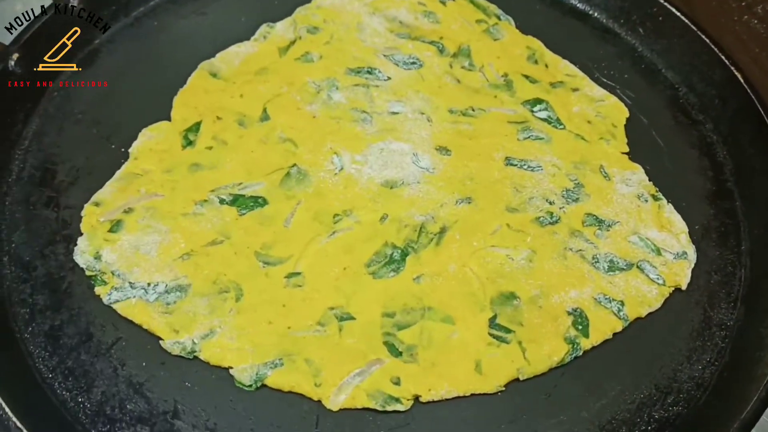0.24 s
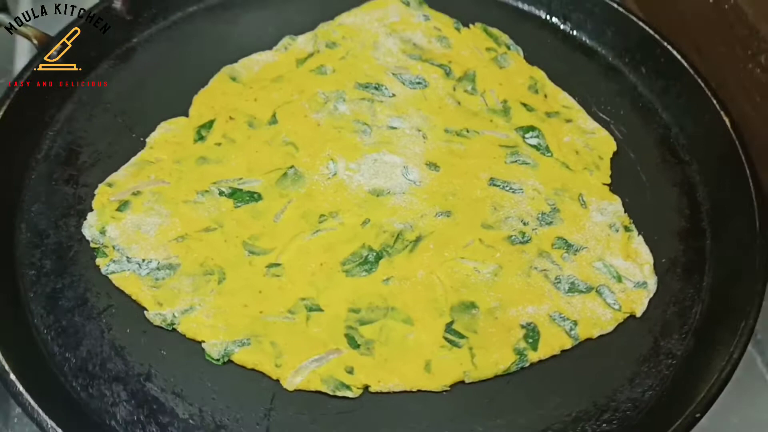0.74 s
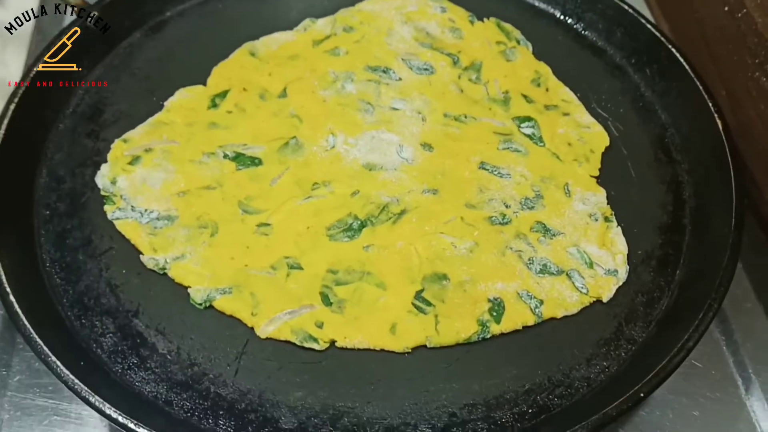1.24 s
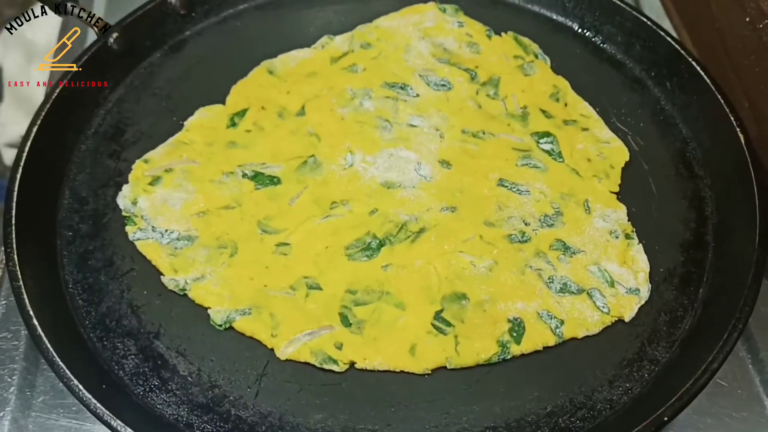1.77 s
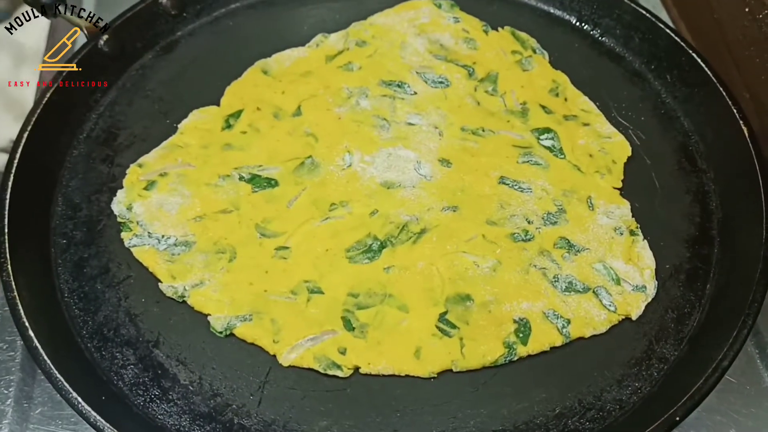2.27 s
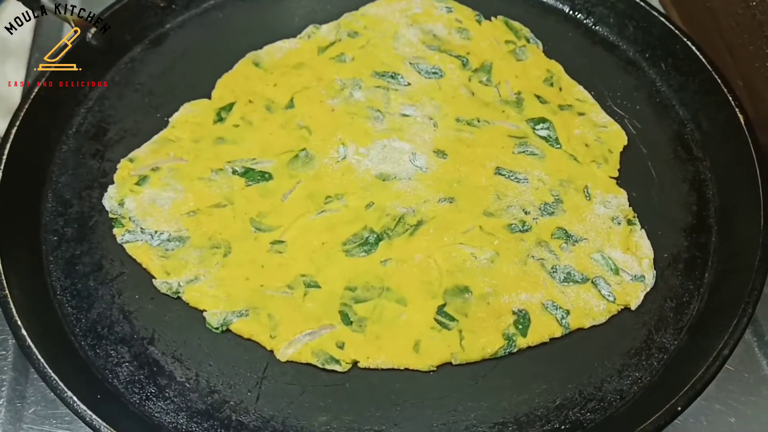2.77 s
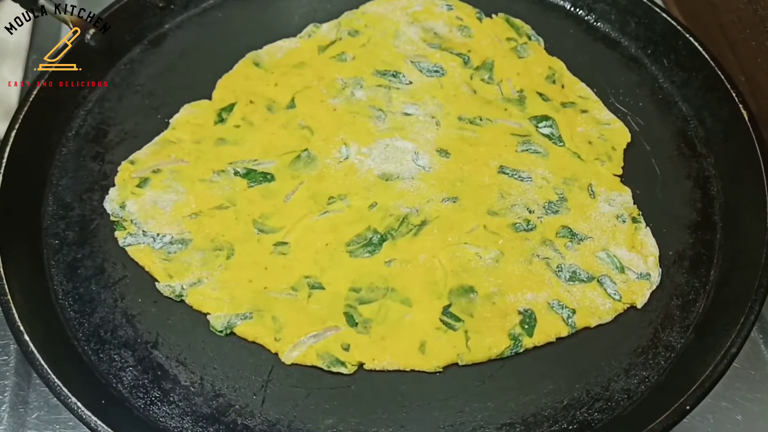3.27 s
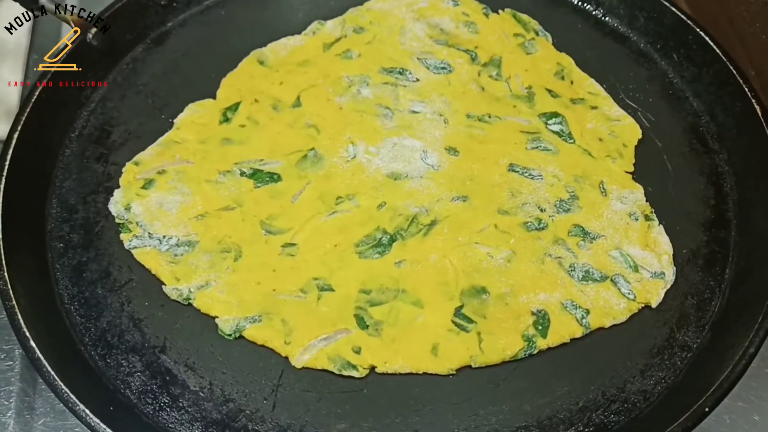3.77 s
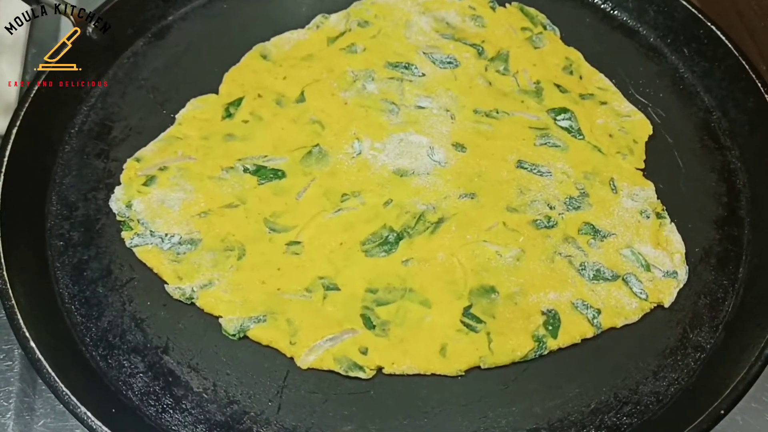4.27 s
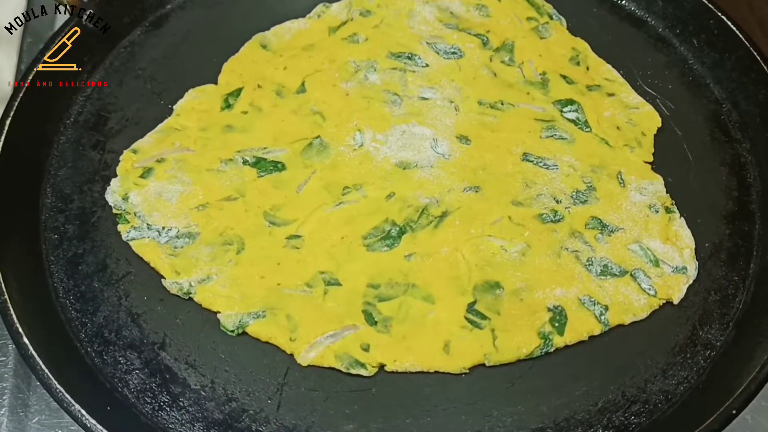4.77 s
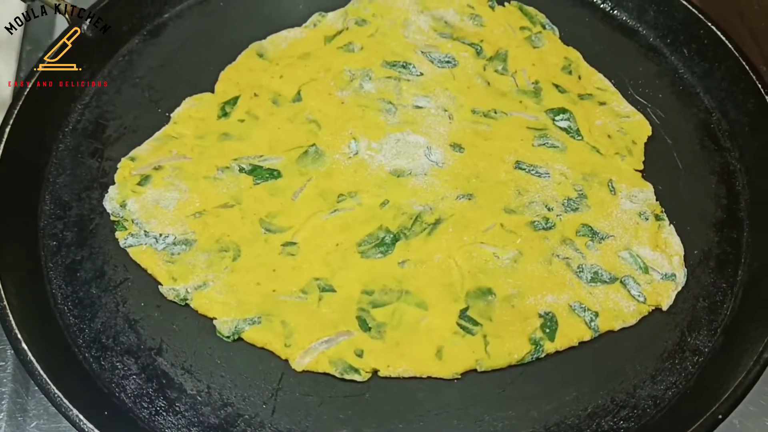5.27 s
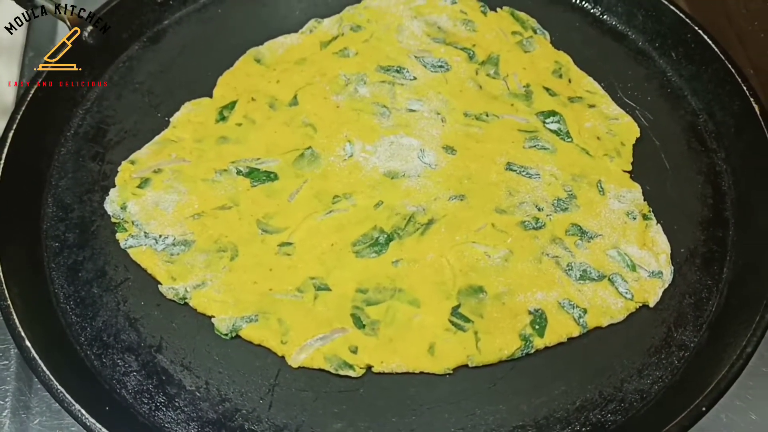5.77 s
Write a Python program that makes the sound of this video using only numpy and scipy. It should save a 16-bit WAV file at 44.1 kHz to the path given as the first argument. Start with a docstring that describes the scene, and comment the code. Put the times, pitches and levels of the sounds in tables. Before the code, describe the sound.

Faint burner hiss and low bubbling in a small kitchen, broken by wooden knocks, thin bangle clinks and brief steel clatter.

```python
"""A gas flame hisses and something bubbles with dull low thumps in a near-steady beat, about six a
second, with others falling between. A flatbread cooks on an iron griddle in a small, hard-walled kitchen.
The griddle spits, wrist bangles clink, and the cook slides things about, handles steel dishes, bumps a
heavy pan and knocks wood on the counter. Flame, spits and slides are shaped noise. Thumps, metal and
wood ring with fading tones after each short push, and echo off the walls."""
import sys
import numpy as np
from scipy import signal
from scipy.fft import rfft, irfft
from scipy.io import wavfile
from scipy.ndimage import uniform_filter1d

SR = 44100
rng = np.random.default_rng(int(sys.argv[2]) if len(sys.argv) > 2 else 0)


def int16_out(signal):
    """Quantize to a 16-bit WAV file."""
    q = np.round(np.clip(np.atleast_2d(signal).T, -1, 1) * 32767)
    wavfile.write(sys.argv[1], SR, q.astype(np.int16))


N = 265923


def from_db(db):
    """Turn decibels into a number to multiply a sound by."""
    return 10 ** (np.asarray(db) / 20)


def at_hz(points, hz):
    """Read between the rows of a table, spacing the octaves evenly."""
    points = np.array(points)
    return np.interp(np.log(hz), np.log(points[:, 0]), points[:, 1])


def coloured(spectrum, size=N):
    """Noise of strength 1, its lows and highs shaped by rows of Hz and dB."""
    hz = np.maximum(np.fft.rfftfreq(size, 1 / SR), 1)
    noise = irfft(rfft(rng.standard_normal(size)) * from_db(at_hz(spectrum, hz)), size)
    return noise / noise.std()


def humped(spectrum, peaks):
    """Shaped noise with a few narrow bands made louder or softer."""
    noise = coloured(spectrum)
    for hz, width_hz, db in peaks:
        band = signal.lfilter(*signal.iirpeak(hz, hz / width_hz, fs=SR), noise)
        noise = noise + (from_db(db) - 1) * band
    return noise


def ring(clicks, hz, ring_s):
    """Each click starts a pure tone. Its ring time, ring_s, is how long it takes to fade by 60 dB."""
    decay, angle = from_db(-60 / (ring_s * SR)), 2 * np.pi * hz / SR
    return signal.lfilter([0, np.sin(angle)], [1, -2 * decay * np.cos(angle), decay ** 2], clicks + 1e-18)


def split_ring(touches, hz, ring_s):
    """Round things ring in close groups: a tone wavers against two weaker neighbours."""
    neighbours = hz * (1 + .008 * rng.standard_normal(2))
    return .8 * ring(touches, hz, ring_s) + .3 * sum(ring(touches, n, ring_s) for n in neighbours)


def blow(contact, tones, levels_db, spread_db):
    """One contact rings all the tones of an object, each with a partly random strength."""
    strengths = from_db(spread_db * rng.standard_normal(len(tones)))
    strengths *= (-1) ** np.arange(len(tones))   # neighbours swing opposite ways
    return sum(strength * from_db(db + level) * ring(contact, hz, ring_s)
               for (hz, db, ring_s), level, strength in zip(tones, levels_db, strengths))


def add(track, start, sound):
    """Mix a sound into a track at a start time in seconds."""
    i = max(round(start * SR), 0)
    track[i:i + len(sound)] += sound[:N - i]


def flame():
    """Gas hisses out of the burner over a low murmur that flickers."""
    # Each row: frequency in Hz, level in dB.
    hiss_spectrum = [(1180, -33.5), (2000, -12), (2980, -11), (3230, -7.5), (3650, -14.5), (4260, -4.5),
                     (5160, -8), (6140, -11), (8330, 0), (9090, -7.5), (10600, -5.5), (12900, -15.5),
                     (13400, -4.5), (14900, 0.5), (16000, -12.5)]
    murmur_spectrum = [(15, -65), (25, -29.5), (37, -41), (78, 2), (162, -0.5), (300, -12), (378, -16.5),
                       (477, -20), (954, -21.5), (1200, -23.5), (2500, -44.5), (3250, -74.5), (5500, -120)]
    # Each row: centre in Hz, width in Hz, boost or cut in dB.
    hiss_peaks = [(3435, 46, 8.5), (4450, 100, 0.5), (5050, 160, 6.5), (7810, 190, 6), (10340, 260, 2.5),
                  (12500, 880, 1.5), (13140, 250, 0), (13770, 400, -1.5), (14200, 430, -10)]
    murmur_peaks = [(149.5, 11, 7.5), (127, 14, -6.5)]   # a narrow low hum near 150 Hz, with a dip just below it
    # Each row: time in seconds, level in dB.
    hiss_levels = [(0.0, -57), (0.47, -57.5), (1.09, -54.5), (1.21, -55), (1.76, -57), (2.22, -53.5),
                   (2.6, -55), (2.72, -57.5), (3.39, -59), (3.68, -55.5), (3.79, -53.5), (3.91, -55),
                   (4.7, -54.5), (4.87, -54), (5.21, -53.5), (5.64, -57), (5.76, -55), (5.88, -52.5),
                   (6.03, -54.5)]
    murmur_levels = [(0.0, -58), (0.34, -55.5), (0.91, -53), (1.02, -48), (1.16, -49.5), (1.93, -50.5),
                     (2.23, -47), (2.54, -46.5), (2.74, -54.5), (2.94, -56), (3.06, -53.5), (3.51, -57.5),
                     (3.64, -56), (3.76, -52), (3.96, -53), (4.77, -53.5), (4.99, -54), (5.31, -59),
                     (5.48, -52.5), (5.62, -58.5), (5.84, -57), (6.03, -55)]
    t = np.arange(N) / SR
    hiss_db = np.interp(t, *np.transpose(hiss_levels))
    murmur_db = np.interp(t, *np.transpose(murmur_levels))
    flicker_db = 2.5 * np.interp(9 * t, np.arange(200), rng.standard_normal(200))   # 9 values a second
    murmur = from_db(murmur_db + flicker_db) * humped(murmur_spectrum, murmur_peaks)
    return from_db(hiss_db) * humped(hiss_spectrum, hiss_peaks) + murmur


def rustle_and_slides():
    """A faint rustle never stops, and swells when something rubs across the counter."""
    # Each row: start in seconds, length in seconds, level in dB.
    slides = [(0.58, 0.076, -65), (1.104, .1, -62.5), (1.887, 0.04, -66), (2.122, 0.08, -63),
              (2.346, 0.065, -55), (2.596, 0.11, -60), (3.4, 0.19, -65.5), (3.72, 0.28, -62),
              (3.991, 0.19, -52.5), (4.4, 0.086, -59), (4.725, 0.09, -49), (4.84, 0.22, -55.5),
              (5.108, 0.091, -52.5), (5.236, 0.4, -64), (5.813, 0.28, -63.5)]
    # Each row: frequency in Hz, level in dB.
    rub_spectrum = [(260, -4.5), (450, 2), (503, 0), (752, -3.5), (851, -12), (920, -1), (1040, -16),
                    (1760, -8.5), (2010, -19.5), (4070, -12), (6500, -16.5), (8450, -51.5), (14300, -120)]
    rise_s, fade_s = 0.018, 0.0442
    t, level = np.arange(N) / SR, from_db(-63)
    for start, length, db in slides:
        rise = np.clip((t - start) / rise_s, 0, 1)
        fade = np.exp(-np.maximum(t - start - length, 0) / fade_s)
        level = level + from_db(db) * rise * fade
    return level * coloured(rub_spectrum)


def bubble_thumps():
    """Each thump is a soft pulse with a noisy edge and a fainter repeat; low tones ring after it."""
    # Each row: start in seconds, level in dB.
    thumps = [(.004, -35.5), (0.18, -39), (0.318, -40), (.392, -37), (.496, -39.5), (0.592, -35),
              (0.673, -36), (.774, -36.5), (.841, -36.5), (.954, -39), (1.012, -35), (1.156, -33),
              (1.332, -37.5), (1.348, -33.5), (1.506, -36.5), (1.691, -33), (1.854, -35), (2.211, -38),
              (2.517, -35), (2.702, -32.5), (2.88, -38), (2.898, -37), (3.036, -38), (3.107, -39),
              (3.21, -39), (3.322, -41), (3.368, -39.5), (3.485, -48.5), (3.543, -38.5), (3.557, -35.5),
              (3.716, -37.5), (3.75, -40.5), (3.891, -37), (3.934, -31), (4.115, -33), (4.232, -38.5),
              (4.517, -35), (4.584, -37.5), (4.906, -30), (5.088, -35), (5.221, -35.5), (5.265, -33),
              (5.374, -35.5), (5.436, -32.5), (5.594, -37), (5.624, -35.5), (5.805, -40.5), (5.834, -36.5),
              (5.977, -35), (6.023, -34.5)]
    # Each row: frequency in Hz, level in dB.
    edge_spectrum = [(250, -28.5), (420, 9), (620, -7), (960, -10), (1200, -18), (2500, -28.5)]
    # Each row: pitch in Hz, level in dB, ring time in seconds.
    body_tones = [(169.6, -42, 0.087), (393.7, -41.5, 0.056), (239.4, -40.5, 0.032)]
    pulse_hz, repeat_s = 222.2, 0.0334
    out, t = np.zeros(N), np.arange(SR // 40) / SR
    cycles = t * pulse_hz - .6
    pulse = np.cos(2 * np.pi * cycles) * np.exp(-(cycles / 0.44) ** 2)
    edge_shape = np.exp(-((t - .006) / 0.0055) ** 2)
    for start, db in thumps:
        edge_db = -15 + 4 * rng.standard_normal()
        edge = from_db(edge_db) * coloured(edge_spectrum, len(t)) * edge_shape
        add(out, start, from_db(db) * (pulse - pulse.mean() + edge))
    add(out, repeat_s, from_db(-8) * out)
    return out + sum(from_db(db) * ring(out, hz, ring_s) for hz, db, ring_s in body_tones)


def griddle_spits():
    """The hot griddle spits in tiny dry bursts of noise."""
    # Each row: start in seconds, level in dB.
    spits = [(0.4096, -46), (0.7761, -49), (1.276, -41), (2.8799, -52), (3.24, -48), (5.9804, -42)]
    # Each row: frequency in Hz, level in dB.
    spectrum = [(1000, -3), (2000, -6), (4500, -2), (7000, -8), (12000, -19)]
    out, t = np.zeros(N), np.arange(SR // 20) / SR
    for start, db in spits:
        add(out, start, from_db(db) * coloured(spectrum, len(t)) * np.exp(-t / 0.0007))
    return out


def background_dips():
    """A volume curve that dips briefly and smoothly."""
    # Each row: middle in seconds, half width in seconds, change in dB.
    dips = [(.46, 0.045, 0), (.87, 0.024, -1), (1.3, 0.044, -2.5), (1.83, 0.021, -2.5), (2.85, 0.032, -2.5),
            (3.3, 0.043, -2.5), (3.67, .04, -2.5), (4.29, 0.026, -3), (4.63, 0.056, -0.5),
            (5.08, .02, -2.5), (5.59, 0.042, -3.5), (5.77, 0.021, -4.5)]
    t = np.arange(N) / SR
    return from_db(sum(db * np.exp(-((t - middle) / width) ** 2) for middle, width, db in dips))


def bangles():
    """Two hard rings of different sizes rattle together: a bright spray of noise, and both ring."""
    # Each row: time in seconds, level in dB, clear ringing in dB, treble tilt in dB per octave,
    # pitch of the louder bangle in Hz, pitch of the other in Hz.
    clinks = [(.571, -38.5, -6, 3, 8370, 7600), (.587, -40, 1, -4, 8430, 8900),
              (.63, -38, -6, -4, 9340, 8600), (.9892, -33.5, -0.5, -2, 9020, 7630),
              (1.0425, -17, -15, 1, 9250, 7600), (1.693, -27, -9, 6, 9170, 8030),
              (1.9275, -41, -4, -6.5, 7430, 9100), (2.0163, -41, 4.5, -7, 9060, 8300),
              (2.6319, -34.5, -13.5, 0, 7440, 9500), (3.563, -31.5, -9, 1.5, 7600, 9150),
              (3.7504, -41.5, -12, -2, 7440, 9100), (3.8382, -44, -5, -1, 9000, 8450),
              (4.506, -34.5, -13, -1, 8800, 7760), (4.6644, -34, -3, -6.5, 9320, 7570),
              (4.7167, -36, -6, 1.5, 9200, 7630), (4.7576, -34, -14, -4, 7530, 9100),
              (4.786, -29.5, -10, -2, 9150, 7570), (5.4983, -44.5, -5, 7, 8450, 7570),
              (5.655, -25.5, -3, 0, 8440, 7620)]
    # Each row: multiple of the bangle's pitch, level in dB.
    tones = [(.432, -25), (.696, -20.5), (1.001, -10), (1.327, -13), (1.678, -5.5), (2.04, -2)]
    # Each row: frequency in Hz, level in dB.
    spray_spectrum = [(1500, -89.5), (3500, -55.5), (5000, -36.5), (6400, -26), (8900, -17.5), (12000, -23),
                      (15200, -10.5)]
    rise_s, rattle_s = .0007, 0.01325
    out, t = np.zeros(N), np.arange(SR // 3) / SR
    shape = (1 - np.exp(-t / rise_s)) * np.exp(-t / rattle_s)
    for start, db, ring_db, tilt_db, loud_hz, other_hz in clinks:
        tilted = [(hz, level + tilt_db * np.log2(hz / loud_hz)) for hz, level in spray_spectrum]
        sound = from_db(-6) * coloured(tilted, len(t)) * shape
        touches = rng.standard_normal(len(t)) * shape
        touches /= np.sqrt(np.sum(touches ** 2))
        strike = .6 * touches + .8 * (t == 0)   # adds a firm first touch
        for hz, bangle_db in [(loud_hz, 0), (other_hz, -8.5)]:
            for ratio, level in tones:
                clear = from_db(ring_db) * split_ring(strike, hz * ratio, ring_s=.1)
                # While the rings press together, each tone dies fast and blurs.
                blurred = from_db(-2) * ring(touches, hz * ratio, ring_s=0.018)
                sound += from_db(level + bangle_db + tilt_db * np.log2(ratio)) * (clear + blurred)
        add(out, start - .002, from_db(db) * sound)
    # Cut the lows below 5000 Hz so the clinks stay thin and bright.
    return signal.sosfilt(signal.butter(2, 5000, "high", fs=SR, output="sos"), out)


def dishes():
    """Thin steel chatters: a dense dry clatter, with a few tones ringing faintly out of it."""
    # Each row: start in seconds, level in dB, boost above 6000 Hz in dB, rise in seconds,
    # rattle in seconds, ringing in dB, where it rings most in Hz.
    hits = [(.599, -52.5, 15, .023, 0.082, -42, 4600), (1.094, -51, 5, 0.0022, 0.027, -16.5, 4740),
            (2.03, -70, -1, .004, 0.032, -6.5, 3600), (4.317, -32, 0, 0.0012, 0.037, -32.5, 3900),
            (4.739, -44, 2, .0035, 0.0089, -31, 3300), (4.775, -41.5, 5, 0.0012, 0.038, -29, 3160),
            (4.96, -49.5, 6.5, 0.004, 0.03, -23.5, 4250), (5.104, -45.5, 0.5, .001, 0.036, -24, 3480),
            (5.164, -46, 12, 0.0035, 0.012, -28, 4000), (5.27, -52, 10, .0079, 0.067, -29, 4000),
            (5.85, -53, 5, .03, 0.085, -34, 4000), (5.919, -54.5, 4.5, 0.024, 0.078, -42, 3600)]
    # Each row: frequency in Hz, level in dB.
    clatter_spectrum = [(590, -48), (1000, -7.5), (1200, -11), (1410, -18), (1530, -15), (1970, -66.5),
                        (2500, -28.5), (3260, -3), (4100, -2), (4540, -15.5), (5270, -9), (6260, -18),
                        (7530, -8.5), (10300, -28), (15500, -18)]
    tones = [(2990, -2), (3630, 0), (4100, 1.5), (4340, -0.5), (5250, -8.5), (5520, -1.5)]
    falloff_db_per_octave = 19
    out, t = np.zeros(N), np.arange(SR // 2) / SR
    for start, db, top_db, rise_s, rattle_s, ring_db, centre_hz in hits:
        shape = (1 - np.exp(-t / rise_s)) * np.exp(-(t / rattle_s) ** 2)   # holds, then stops short
        uneven_db = 5.25 * rng.standard_normal(len(t) // 90 + 1)   # a new level every 90 samples
        uneven = from_db(uneven_db).repeat(90)[:len(t)]
        spectrum = [(hz, level + top_db * (hz > 6000)) for hz, level in clatter_spectrum]
        sound = coloured(spectrum, len(t)) * shape * uneven
        touches = rng.standard_normal(len(t)) * shape
        first_touch = 0.5 * np.sqrt(np.sum(touches ** 2)) * (t == 0)   # the firmest one
        strike = 0.53 * touches + first_touch
        for hz, level in tones:
            falloff_db = falloff_db_per_octave * abs(np.log2(hz / centre_hz))
            sound += from_db(ring_db + level - falloff_db) * split_ring(strike, hz, ring_s=.13)
        add(out, start, from_db(db) * sound)
    return out


def pan():
    """A short scuff rings a few clear, low tones in the thick metal of a heavy pan."""
    # Each row: start in seconds, level in dB, boost above 1000 Hz in dB.
    hits = [(1.095, -37.5, -17), (3.708, -44, -10), (4.317, -31, -2), (4.452, -41, 15), (4.714, -41.5, 1),
            (4.775, -27, -11), (4.919, -44.5, 4), (4.984, -40.5, 0), (5.044, -56.5, 16), (5.104, -33, 1.5),
            (5.708, -51.5, -3)]
    # Each row: pitch in Hz, level in dB, ring time in seconds.
    tones = [(773, 2.5, 0.041), (1460, -16.5, 0.12), (1534, -16, .09), (1114, -19.5, 0.12),
             (1660, -27, 0.17)]
    out, t = np.zeros(N), np.arange(SR // 2) / SR
    for start, db, upper_db in hits:
        scuff = rng.standard_normal(len(t)) * np.exp(-t / 0.021)
        scuff /= np.sqrt(np.sum(scuff ** 2))
        levels = [db + upper_db * (hz > 1000) for hz, _, _ in tones]
        add(out, start, blow(scuff, tones, levels, spread_db=3.5))
    return out


def counter_knocks():
    """Wood hits the counter with a brief thud and a short crack, and the counter's body rings."""
    # Each row: start in seconds, level in dB, thud pitch in Hz, then body, deep body and crack in dB.
    knocks = [(1.096, -37.5, 480, -14, -1, -39), (2.01, -6, 544, -13, -13.5, -24.5),
              (2.063, -13.5, 556, -11.5, -11.5, -42), (2.315, -10, 531, -22.5, -8, -30),
              (4.011, -28, 187, -13.5, -1.5, -25), (4.319, -26, 496, -7, -4, -31),
              (4.451, -33.5, 518, -17, -4.5, -32), (4.716, -38.5, 224, -2.5, -12, -35),
              (4.777, -30, 447, -15.5, -11.5, -39), (5.105, -38.5, 226, -6.5, -13, -7)]
    # Each row: pitch in Hz, level in dB, ring time in seconds.
    body_tones = [(352, 3.5, 0.2), (422.4, 9.5, 0.066), (510, -11.5, 0.097), (562.6, 1, 0.41),
                  (640, 6.5, 0.032), (805, -10.5, 0.26), (861, 0.5, 0.14), (990, -0.5, 0.071),
                  (1317, 6, 0.01), (1402, -35.5, 0.014), (1870, -30, 0.036)]
    deep_tones = [(158.9, 5.5, 0.16), (203.4, 3, 0.1), (238.7, 0, .1), (319.7, 6.5, 0.044)]
    # Each row: frequency in Hz, level in dB.
    crack_spectrum = [(800, 3), (1700, 3), (2600, -8.5), (3600, -10), (5200, -14.5), (9000, -34.5),
                      (16000, -35.5)]
    out, t = np.zeros(N), np.arange(SR // 2) / SR
    phase = 2 * np.pi * 450 * t   # a soft contact, strongest near 450 Hz
    contact = (1 - phase) * np.exp(-phase)   # push and rebound cancel
    contact /= np.abs(contact).sum()
    for start, db, thud_hz, body_db, deep_db, crack_db in knocks:
        cycles = t * thud_hz
        thud = np.sin(2 * np.pi * cycles) * cycles ** 2 * np.exp(2 - cycles / 0.77) / 1.74
        levels = [body_db] * len(body_tones) + [deep_db] * len(deep_tones)
        body = blow(contact, body_tones + deep_tones, levels, spread_db=1.5)
        crack = from_db(crack_db) * coloured(crack_spectrum, len(t)) * np.exp(-t / 0.025)
        add(out, start, from_db(db) * (thud + body + crack))
    return out


def kitchen(sound, echo_db):
    """The hard walls add a wash of echoes in which each octave fades at its own speed."""
    # Each row: frequency in Hz, the room's ring time in seconds.
    ring_times = [(100, 0.46), (500, 0.24), (2000, 0.22), (6000, 0.25), (16000, 0.16)]
    t, tail = np.arange(SR // 2) / SR, 0
    for low_hz in 60 * 2. ** np.arange(9):
        octave = signal.butter(2, [low_hz, min(2 * low_hz, 20000)], "band", fs=SR, output="sos")
        band = signal.sosfilt(octave, rng.standard_normal(len(t)))
        tail = tail + band * from_db(-60 * t / at_hz(ring_times, 1.79 * low_hz))
    build_up = 1 - np.exp(-t / 0.0015)
    tail = tail * build_up / np.sqrt(np.sum(tail ** 2))
    return sound + from_db(echo_db) * signal.fftconvolve(sound, tail)[:N]


def turn_down_quiet(sound):
    """Below a set level, quieter sound is turned down further. The volume sinks slowly, rises at once."""
    quiet_db, cut_per_db, listen_s, sink_db_per_s = -42, 0.15, 0.012, 114
    level_db = 10 * np.log10(uniform_filter1d(sound ** 2, round(listen_s * SR)) + 1e-12)
    sink_db = sink_db_per_s * np.arange(N) / SR
    held_db = np.maximum.accumulate(np.minimum(level_db, quiet_db) + sink_db) - sink_db
    return sound * from_db(cut_per_db * (held_db - quiet_db))


def scene():
    """Knocks, thumps and metal echo in the kitchen over the flame, slides and spits, in one channel."""
    low = kitchen(counter_knocks() + pan(), echo_db=-3) + kitchen(bubble_thumps(), echo_db=-8)
    bright = kitchen(dishes(), echo_db=0) + kitchen(bangles(), echo_db=2.5)
    background = background_dips() * (flame() + rustle_and_slides())
    return (background + griddle_spits() + low + bright)[None]


def record(dry):
    """The microphone loses the lowest and highest sounds; quiet moments drop, then the top is cut."""
    bass_loss = signal.butter(2, 70, "high", fs=SR, output="sos")
    treble_loss = signal.cheby1(12, 1, 15600, fs=SR, output="sos")
    top_cut = signal.cheby2(12, 70, 16650, fs=SR, output="sos")
    heard = signal.sosfilt(treble_loss, signal.sosfilt(bass_loss, dry))
    return signal.sosfilt(top_cut, turn_down_quiet(heard))


dry = scene()
out = record(dry)
int16_out(out)
```